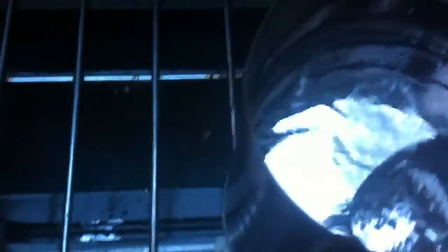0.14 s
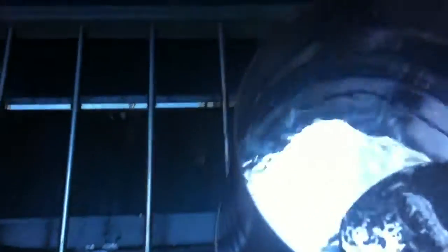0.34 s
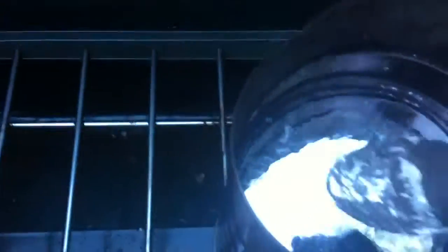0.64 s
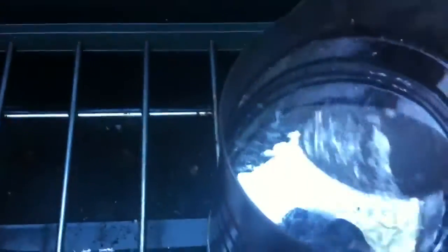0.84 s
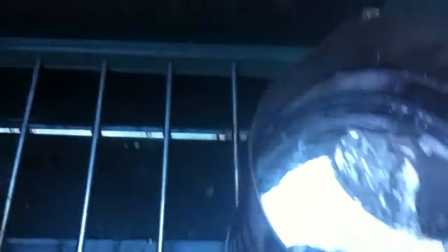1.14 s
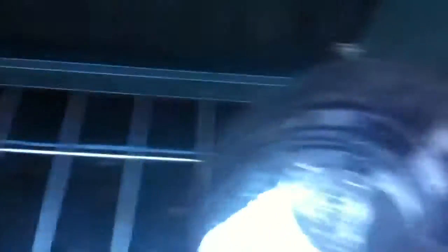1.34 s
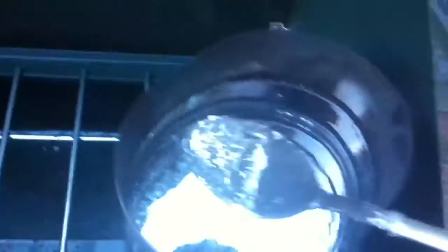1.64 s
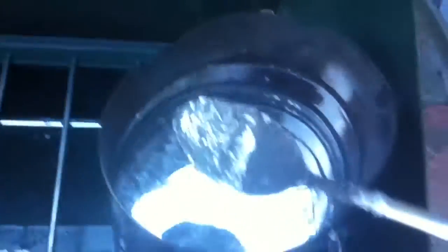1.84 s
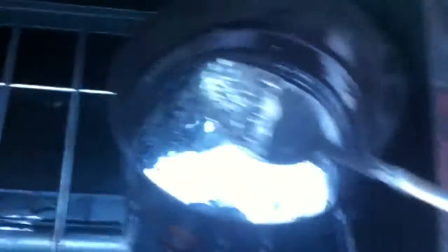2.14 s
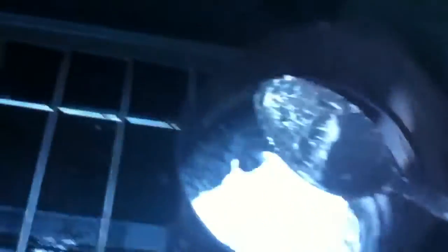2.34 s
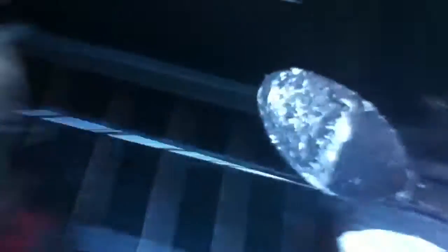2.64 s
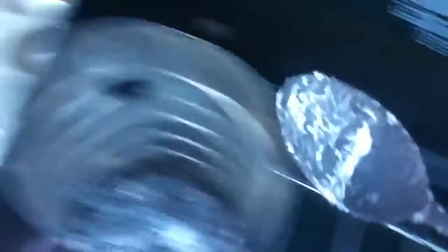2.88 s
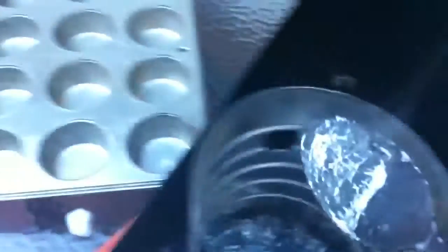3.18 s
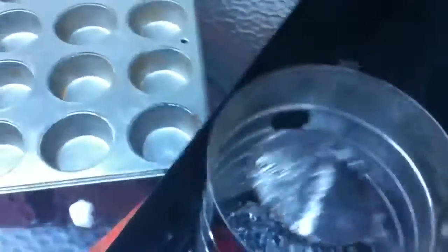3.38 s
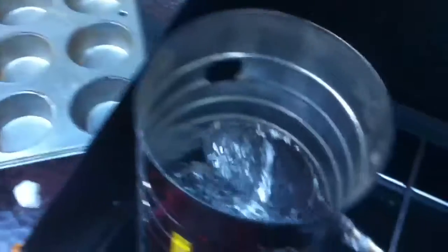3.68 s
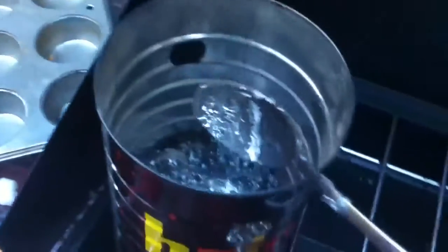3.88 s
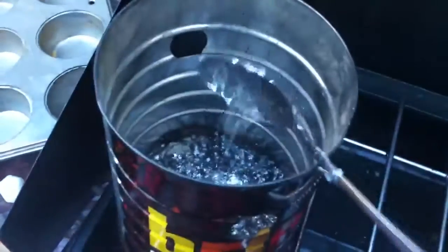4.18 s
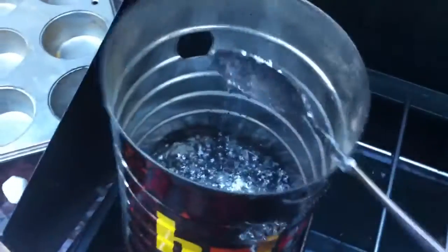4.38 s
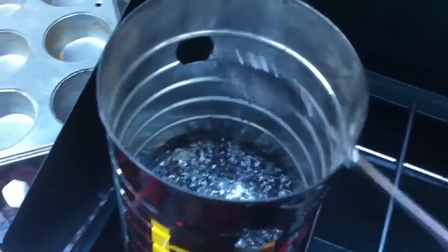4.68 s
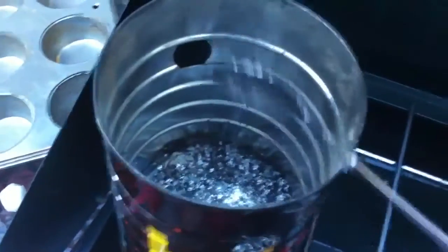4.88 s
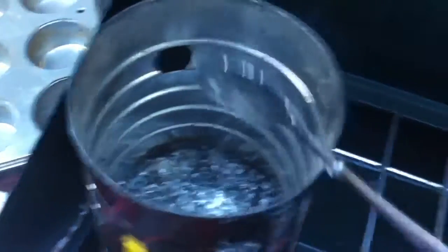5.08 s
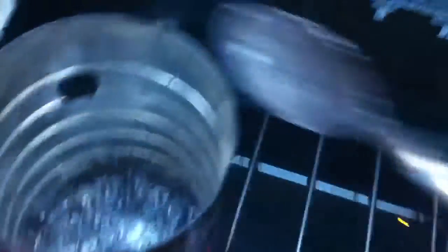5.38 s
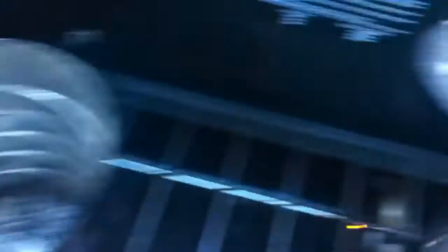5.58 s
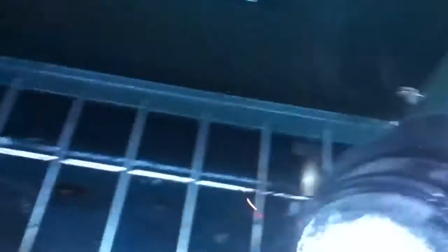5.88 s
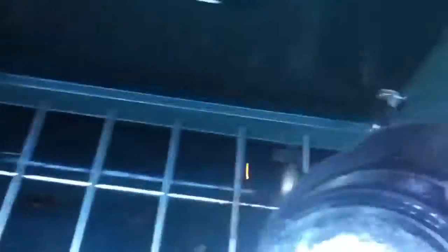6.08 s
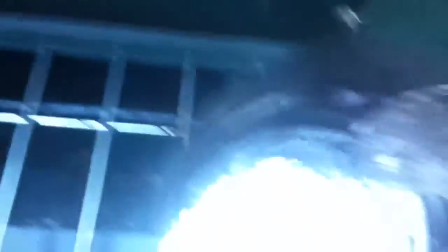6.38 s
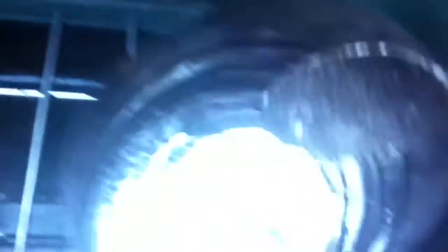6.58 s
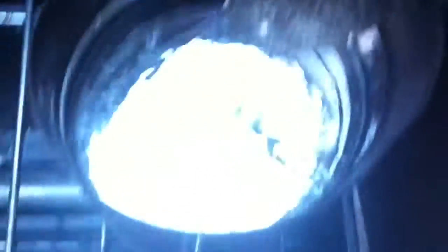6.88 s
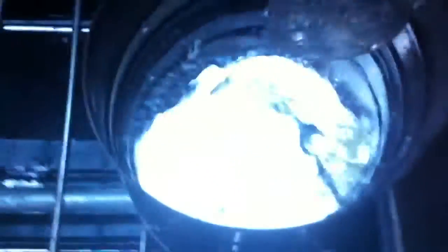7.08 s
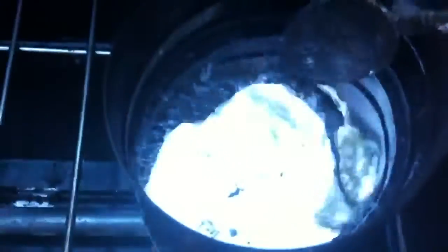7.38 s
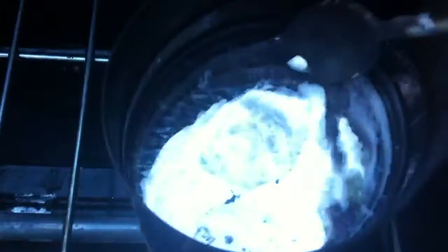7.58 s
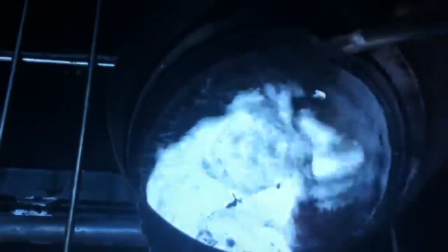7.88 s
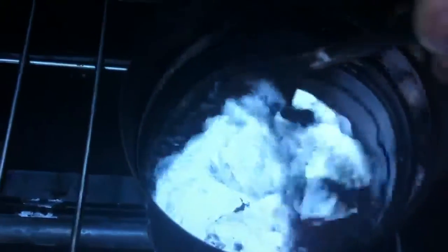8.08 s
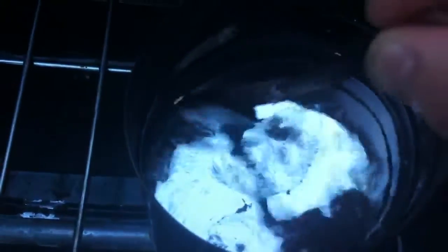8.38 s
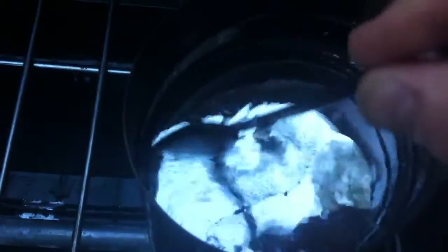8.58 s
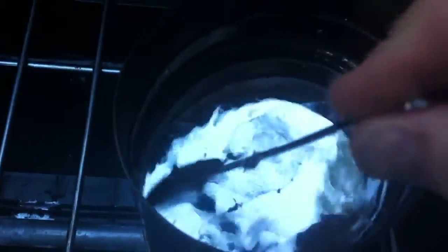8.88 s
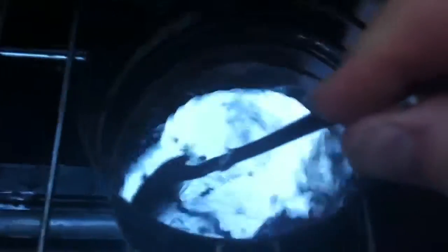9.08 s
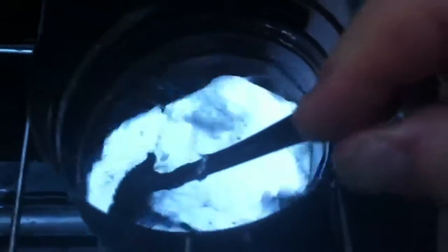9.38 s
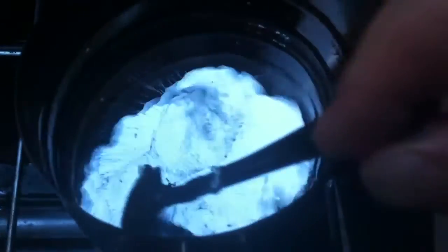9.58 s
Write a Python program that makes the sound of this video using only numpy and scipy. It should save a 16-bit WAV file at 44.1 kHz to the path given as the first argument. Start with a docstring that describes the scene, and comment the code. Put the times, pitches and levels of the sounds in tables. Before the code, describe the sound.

Several sharp, ringing spoon knocks on a tin can and a clatter on wood, over the steady hiss and low roar of a gas burner.

```python
"""A spoon is knocked clean on the rim of an empty can: the thin wall crashes, thumps and rings,
and the spoon bounces in ever shorter hops. It is then dropped and clatters on a wooden bench.
Crumbs of dross snap, and a thin rod stirs softly through the crust on a tin of molten metal.
Under it all a gas burner hisses, sings and roars, its tone shifting as the listener moves.
The knocks and the clatter echo briefly in the workshop."""
import sys
import numpy as np
from scipy import signal
from scipy.fft import rfft, irfft, next_fast_len
from scipy.io import wavfile
from scipy.ndimage import uniform_filter1d

SR = 44100
rng = np.random.default_rng(int(sys.argv[2]) if len(sys.argv) > 2 else 0)


def inscribe(sig):
    """Save sig as 16-bit PCM at rate SR to the path in sys.argv[1].

    A 1-D sig is mono; a 2-D sig holds one channel per row.
    Samples are clipped to [-1, 1] before scaling.
    """
    pcm = np.round(np.clip(np.atleast_2d(sig).T, -1, 1) * 32767)
    wavfile.write(sys.argv[1], SR, pcm.astype(np.int16))


N = 429534
RING_SIZE = 49152
AGE = np.arange(RING_SIZE) / SR   # seconds since a sound began

# Spoon blows on the can; a touch or flight of 0 means none:
# start_s, level_db, thump_db, treble_db, second_touch_s, first_flight_s, hand_damping_db
BLOWS = [(3.741, -13.5, -31.5, -55, 0, 0.0025, 0), (4.2018, -1, -20.5, 2, 0, 0, 0),
         (4.457, 2, -8, 3.5, 0.0092, 0.099, 10), (4.6919, 2.5, -11.5, 4, 0.0013, 0.057, 21),
         (4.904, 4.5, -9.5, -2, 0.018, 0.0642, 6), (5.1033, 6.5, -7.5, -0.5, 0.024, 0.08, 1.5)]
RESTITUTION, BOUNCE_COUNT = 0.68, 4   # each flight lasts this share of the one before
BOUNCE_GROWTH, REFERENCE_FLIGHT_S = 0.93, 0.086   # longer flights land harder
TOUCH_LOSS_DB_PER_S, GRIP_GROWTH = 380, 3.3   # late touches are weaker; the hand chokes late bounces
TOUCH_TREBLE_DB, BOUNCE_TREBLE_DB, LIGHT_THUMP_DB = -12, -8.5, -27   # light contacts: dull, little body


def spoon_contacts():
    """Blows with their second touches, and bounces: two lists of start_s, level_db, thump_db, treble_db."""
    blows, bounces = [], []
    for s, db, thump_db, treble_db, touch_s, flight_s, damping_db in BLOWS:
        blows.append((s, db, thump_db, treble_db))
        if touch_s > 0:
            touch_db = db - TOUCH_LOSS_DB_PER_S * touch_s
            blows.append((s + touch_s, touch_db, touch_db + LIGHT_THUMP_DB, TOUCH_TREBLE_DB))
        for k in range(BOUNCE_COUNT if flight_s > 0 else 0):
            free_db = BOUNCE_GROWTH * 20 * np.log10(flight_s / REFERENCE_FLIGHT_S)
            landing_db = free_db - damping_db * k ** GRIP_GROWTH
            s += flight_s
            bounces.append((s, landing_db, landing_db + LIGHT_THUMP_DB, BOUNCE_TREBLE_DB))
            flight_s *= RESTITUTION
    return blows, bounces


# Tone of the can's wash of weak modes: pitch_hz, density_db
CAN_COLOUR = [(80, -30), (160, -12.5), (450, 4.5), (700, -2.5), (1200, 2.5), (1900, 7.5), (3200, 4.5),
              (3600, 2.5), (4600, 1.5), (6200, -3), (10000, -4), (12300, -2.5), (14000, -4), (16000, -9)]
# Decay of that wash: pitch_hz, t60_s
CAN_T60 = [(100, 0.074), (2000, 0.18), (6000, 0.15), (15000, 0.077)]
# Decay of the contact's short crack: pitch_hz, t60_s
CRACK_T60 = [(200, 0.043), (15000, 0.064)]


def can_crashes(hits):
    """The spoon's edge cracks on the rim and sets the thin can crashing."""
    out = np.zeros(N)
    wash = from_db(11) * dense_ring(CAN_COLOUR, CAN_T60, size=8192)
    for s, db, _, treble_db in hits:
        crack = from_db(9) * dense_ring(CAN_COLOUR, CRACK_T60, size=8192)
        crash = brighten(wash + crack, treble_db, contact_corner(treble_db, base_hz=3200))
        add(out, s, from_db(db) * crash)
    return out


def can_thumps(hits):
    """The thin wall heaves for a few cycles; a deep dent stiffens it, so the pitch starts high and sags."""
    out = np.zeros(N)
    swell = AGE / 0.0056
    envelope = (swell * np.exp(1 - swell)) ** 2
    for s, _, thump_db, _ in hits:
        pitch_hz = 412 * (1 + 0.87 * from_db(thump_db) * np.exp(-AGE / 0.0066))
        heave = envelope * np.sin(2 * np.pi * np.cumsum(pitch_hz) / SR)
        add(out, s, from_db(thump_db) * heave)
    return out


# Partials that ring after a knock: low hum of room and bench, then the can's ring:
# pitch_hz, level_db, t60_s
KNOCK_MODES = [(155.4, -21, 0.8), (195.6, -10.5, 0.45), (219.4, -18, 0.48), (258, -32, 5.9),
               (296.5, -19.5, 0.59), (368.7, -8.5, 0.41), (521.4, -27, 3.1), (790, -15, 0.25),
               (930, -15.5, 0.24), (1044, -36, 0.19), (1187, -1.5, 0.04), (1427, -11, 0.28),
               (1770, -4, 0.18), (1867, -1, 0.13), (1980, -3, 0.16), (2655, -7, 0.32), (2740, 7, 0.04),
               (3180, 6, 0.051), (3200, 6, 0.045), (3350, -18, 0.066), (3764, -1, 0.071), (3940, -6, 0.12),
               (4270, 3.5, 0.064), (4590, -1.5, 0.17), (5230, -1, 0.053), (7030, -2, 0.075),
               (9750, 5, 0.059), (10150, -0.5, 0.041), (11000, -27, 0.06), (13600, -11, 0.041)]


def knock_ring(hits):
    """Every blow lands on a slightly different spot and stirs the same modes in a new mix."""
    return from_db(-23.5) * struck(KNOCK_MODES, hits, scatter_db=2.5)


# Partials of the can that the bounces bring out: pitch_hz, level_db, t60_s
BOUNCE_MODES = [(2726, -13.5, 0.063), (4900, -29.5, 0.064)]


def bounce_pings(bounces):
    """The can pings brightly as the bouncing spoon lands on another spot."""
    return struck(BOUNCE_MODES, bounces, scatter_db=1)


# The dropped spoon's landings: start_s, level_db, treble_db
LANDINGS = [(5.649, 2.5, -18), (5.656, -3.5, -17), (5.687, -21, 15), (5.713, -8, 1), (5.730, -11, 1.5),
            (5.798, -29.5, 13.5), (6.091, -31, -12)]
# Tone of the wooden bench top: pitch_hz, density_db
BENCH_COLOUR = [(30, -38), (95, -35), (150, -7), (215, -1.5), (320, 2), (600, 5), (950, 4.5), (1350, 9.5),
                (1900, 9), (2600, 2.5), (4200, -2), (5500, -9.5), (8500, -12), (15000, -24)]
# Decay of the wood: pitch_hz, t60_s
BENCH_T60 = [(100, 0.12), (1000, 0.1), (4000, 0.22), (15000, 0.17)]


def dropped_spoon():
    """A dull bang on the bench top, then a quick clatter as the spoon rocks to rest."""
    out = np.zeros(N)
    for s, db, treble_db in LANDINGS:
        bang = dense_ring(BENCH_COLOUR, BENCH_T60, size=12288)
        add(out, s, from_db(db + 15.5) * brighten(bang, treble_db, corner_hz=3530))
    return out


# The bench's strongest partials: pitch_hz, level_db, t60_s
BENCH_MODES = [(194, -1.5, 0.39), (245, -1, 0.25), (314, -15, 0.48), (460, 0, 0.47), (775, -7, 0.72),
               (840, -1.5, 0.36), (1015, -5, 0.37), (1070, -11, 0.24), (1297, 1, 0.32), (1400, 11, 0.16),
               (1660, 4, 0.13), (2510, 17, 0.053)]


def bench_ring():
    """The bench rings on after each landing."""
    return from_db(-27.5) * struck(BENCH_MODES, LANDINGS, scatter_db=0)


# Small dry ticks: start_s, level_db
TICKS = [(5.462, -7), (8.105, -27)]


def dross_ticks():
    """Crumbs of dross snap, each over in a millisecond or two."""
    out = np.zeros(N)
    for s, db in TICKS:
        snap = rng.standard_normal(512) * np.exp(-AGE[:512] / 0.00041)
        softened = signal.lfilter(*signal.butter(1, [600, 2200], "band", fs=SR), snap)
        add(out, s, from_db(db) * energy_one(softened))
    return out


# Strokes of the rod: middle_s, length_s, level_db
STROKES = [(8.1, 0.21, -51.5), (8.652, 0.8, -52.5), (9.115, 0.42, -50.5), (9.67, 0.43, -54.5)]
# Tone of the crumbling crust: pitch_hz, density_db
CRUST_COLOUR = [(60, -40), (160, -11), (270, 9), (400, 3.5), (620, -3), (900, 7.5), (1300, -8.5),
                (2500, -4), (4000, -8), (8000, -11), (16000, -20)]
# Lumps of dross turning over: start_s, level_db
LUMPS = [(7.656, -19), (8.091, -22), (8.275, -19.5), (8.433, -19), (8.655, -23), (8.761, -15)]
# Their dull decay: pitch_hz, t60_s
LUMP_T60 = [(200, 0.14), (8000, 0.18)]
GRAINS_PER_S = 4000


def stirring_rod():
    """The crust crumbles in clumps of tiny grains with each stroke; now and then a lump turns over."""
    grains = (rng.random(N) < GRAINS_PER_S / SR) * rng.standard_normal(N)
    grains *= from_db(1.9 * np.tanh(drift(per_s=22)))
    now = np.arange(N) / SR
    push = sum(from_db(db) * np.cos(np.pi * np.clip((now - middle_s) / length_s, -.5, .5))
               for middle_s, length_s, db in STROKES)
    out = push * colour(grains, CRUST_COLOUR)
    for s, db in LUMPS:
        lump = dense_ring(CRUST_COLOUR, LUMP_T60, size=8192)
        soft_attack = 1 - np.exp(-AGE[:len(lump)] / 0.0044)
        add(out, s, from_db(db) * lump * soft_attack)
    return out


# The listener's path: time_s, stove_nearness_db, turn_share (0 faces the stove, 1 the can)
LISTENER = [(0, 1.5, 0.23), (1.2, -0.2, 0.27), (1.7, 1, 0.17), (2.3, -1.2, 0.15), (2.7, 2.7, 0.38),
            (2.95, -1, 0.53), (3.25, 2, 1), (4.2, 1, 0.86), (5.4, 3.5, 0.47), (5.9, 3, 0.05), (7.3, -4, 0),
            (8.5, 1, 0), (9.7, -1.8, 0)]
# Level ride of the flame's low roar: time_s, level_db
FLAME_LEVEL = [(0.9, -56.5), (1.6, -59.5), (2.8, -58.5), (3.6, -58), (6.2, -54.5), (7.2, -58), (9.7, -56)]
# Tone of the roar: pitch_hz, density_db
FLAME_COLOUR = [(25, -21), (55, -19), (80, -20), (110, -4.5), (160, -1.5), (230, 0), (320, -4.5), (480, -9),
                (1000, -8.5), (1300, -20), (3000, -29.5)]
# Resonances of burner tube and tin: pitch_hz, nominal_width_hz, facing_db, turned_db
TUBE_MODES = [(689, 40, -1.5, -10.5), (1429, 217, -11.5, -9), (1717.5, 115, 1.5, 1.5),
              (1991, 57, -1.5, 6.5), (2129, 195, -1, -8), (2566, 97, -4.5, -11.5), (2950, 46, -1, -41),
              (3746, 81, -7.5, -16.5), (4494, 39, -7, -12)]
# Resonances of the gas jet: pitch_hz, nominal_width_hz, facing_db, turned_db
JET_MODES = [(5132, 55, 1.5, 5), (5775, 130, -6.5, 2.5), (6247, 88, 0.5, -2.5), (6790, 120, -2, 0),
             (7400, 205, 1.5, -3.5), (8005, 165, 4, 1), (8670, 77, -7, -3.5), (9400, 69, 1, -27.5),
             (10000, 170, -7.5, -6.5), (10590, 900, -2.5, -12.5), (13230, 430, 1.5, 0), (13730, 130, 3, 3),
             (14450, 400, -7, -11), (15450, 420, 2, -2)]
# Tone of the jet's broad hiss: pitch_hz, density_db
JET_COLOUR = [(300, -39), (1000, -14), (2600, 6), (4200, 1.5), (7500, 0), (9000, 0.5), (10500, -6),
              (11900, -9), (13500, 2), (16000, 3.5)]
TUBE_DB, JET_DB = -47.5, -49.5   # at nearness 0
JET_NEARNESS_SHARE, HISS_TURNED_DB = 0.54, -6.5   # the broad hiss beams away from the can


def gas_burner():
    """The jet hisses; the mixing tube sings and the flame roars low, both fluttering with the flow."""
    near_db, turned = in_time(LISTENER)
    flame_db = in_time(FLAME_LEVEL)[0] + 1.2 * drift(per_s=47)
    flame = from_db(flame_db) * colour(rng.standard_normal(N), FLAME_COLOUR)
    tube_db = TUBE_DB + near_db + 0.96 * drift(per_s=45)
    tube = from_db(tube_db) * blown(TUBE_MODES, turned)
    whistle = blown(JET_MODES, turned)
    hiss = from_db(HISS_TURNED_DB * turned) * colour(rng.standard_normal(N), JET_COLOUR)
    jet = from_db(JET_DB + JET_NEARNESS_SHARE * near_db) * sway(whistle + hiss, wander_s=.00004)
    return flame + tube + jet


def blown(modes, turned):
    """Turbulence sings in resonances; each beams in its own way, so turning changes their mix."""
    out = 0
    for hz, width_hz, facing_db, turned_db in modes:
        peak = resonate(rng.standard_normal(N), hz, 0.64 * width_hz)
        song = resonate(peak, hz, 4.2 * width_hz)   # trims the skirts
        out = out + song * ((1 - turned) * from_db(facing_db) + turned * from_db(turned_db))
    return rms_one(out)


# Close reflections off tin and stove lid: delay_s, level_db
NEAR_ECHOES = [(.0007, -2.5), (.0013, -1), (.0023, -17.5), (.0036, -1.5)]


def sway(x, wander_s):
    """The listener moves among nearby metal walls, whose echoes comb the hiss in shifting patterns."""
    now, out = np.arange(N), x
    for delay_s, db in NEAR_ECHOES:
        lag = (delay_s + wander_s * np.tanh(drift(per_s=2.5))) * SR
        out = out + from_db(db) * np.interp(now - lag, now, x)
    return rms_one(out)


# Tone of the workshop's reverb: pitch_hz, density_db
ROOM_COLOUR = [(40, -20), (100, -2.5), (170, 15.5), (330, 12), (480, 1.5), (1000, 9.5), (2000, -0.5),
               (4000, -12), (8000, -3), (16000, -23)]
# Length of its tail: pitch_hz, t60_s
ROOM_T60 = [(120, 1), (320, 0.68), (840, 0.48), (2200, 0.38), (5800, 0.37), (15000, 0.5)]


def workshop(x):
    """Reflections build up over the first milliseconds; the bass lingers longest."""
    build_up = 1 - np.exp(-(AGE / 0.014) ** 2)
    tail = dense_ring(ROOM_COLOUR, ROOM_T60, size=RING_SIZE) * build_up
    return signal.fftconvolve(x, tail)[:N]


def struck(modes, hits, scatter_db):
    """Each hit kicks a set of decaying sines; soft contacts miss the high ones."""
    s, hit_db, *_, treble_db = np.transpose(hits)
    corner_hz = contact_corner(treble_db, base_hz=4200)
    out = np.zeros(N)
    for hz, level_db, t60_s in modes:
        hardness_db = treble_db * hz ** 2 / (hz ** 2 + corner_hz ** 2)
        strengths = from_db(hit_db + hardness_db + level_db + scatter_db * rng.standard_normal(len(s)))
        kicks = np.full(N, 1e-18)
        kicks[np.round(s * SR).astype(int)] = strengths * rng.choice([-1, 1], len(s))
        r, w = np.exp(-np.log(1000) / (t60_s * SR)), 2 * np.pi * hz / SR
        out += signal.lfilter([0, np.sin(w)], [1, -2 * r * np.cos(w), r * r], kicks)
    return out


def dense_ring(spectrum, decays, size):
    """Countless overlapping modes: noise in which each octave dies at its own rate."""
    hz = np.fft.rfftfreq(size, 1 / SR)
    modes = np.exp(2j * np.pi * rng.random(len(hz))) * from_db(at_hz(spectrum, hz))
    out = 0
    for low_hz in 20 * 2. ** np.arange(10):
        octave = irfft(modes * (hz >= low_hz) * (hz < 2 * low_hz))
        t60_s = at_hz(decays, low_hz * np.sqrt(2))
        out = out + octave * np.exp(-np.log(1000) * AGE[:size] / t60_s)
    return energy_one(out)


def contact_corner(treble_db, base_hz):
    """A soft contact lasts longer, so its treble rolls off from a lower pitch."""
    return base_hz * from_db(0.11 * treble_db)


def brighten(x, treble_db, corner_hz):
    """A harder contact lifts the treble, a softer one dulls it: two gentle shelves in a row."""
    for _ in range(2):
        low = signal.lfilter(*signal.butter(1, corner_hz, fs=SR), x)
        x = low + from_db(treble_db / 2) * (x - low)
    return x


def resonate(x, hz, width_hz):
    """Two-pole resonance with a peak gain of 1."""
    r = np.exp(-np.pi * width_hz / SR)
    feedback = [1, -2 * r * np.cos(2 * np.pi * hz / SR), r * r]
    return signal.lfilter(np.array([1, 0, -1]) * (1 - r * r) / 2, feedback, x)


def colour(x, spectrum):
    """Give a steady sound a spectrum; rms 1."""
    size = next_fast_len(len(x), True)
    gains = from_db(at_hz(spectrum, np.fft.rfftfreq(size, 1 / SR)))
    return rms_one(irfft(rfft(x, size) * gains, size)[:len(x)])


def drift(per_s):
    """Random wander of spread 1."""
    knots = rng.standard_normal(4000)
    return rms_one(np.interp(np.arange(N) / SR * per_s, np.arange(len(knots)), knots))


def in_time(rows):
    """One curve per column, at every sample."""
    s, *columns = np.transpose(rows)
    return [np.interp(np.arange(N) / SR, s, column) for column in columns]


def at_hz(points, hz):
    """Read a table on a log-frequency axis."""
    known_hz, values = np.transpose(points)
    return np.interp(np.log(hz + 1e-3), np.log(known_hz), values)


def add(out, s, sound):
    """Mix a sound in at time s."""
    start = int(round(s * SR))
    out[start:start + len(sound)] += sound[:N - start]


def from_db(db):
    """Decibels to gain."""
    return 10 ** (np.asarray(db) / 20)


def rms_one(x):
    """Scale to rms 1."""
    return x / np.sqrt(np.mean(x ** 2) + 1e-20)


def energy_one(x):
    """Scale to a total energy of 1."""
    return x / np.sqrt(np.sum(x ** 2) + 1e-20)


def gain_control(x, threshold_db, share, attack_s, release_db_per_s):
    """Turn the level down by a share of its excess over the threshold, then let it creep back."""
    level_db = 10 * np.log10(np.abs(uniform_filter1d(x ** 2, size=441)) + 1e-12)
    excess_db = np.maximum(level_db - threshold_db, 0)
    recovery_db = release_db_per_s * np.arange(N) / SR
    cut_db = np.maximum.accumulate(share * excess_db + recovery_db, axis=-1) - recovery_db
    r = np.exp(-1 / (attack_s * SR))
    return x * from_db(-signal.lfilter([1 - r], [1, -r], cut_db))


def scene():
    """The impacts feed the reverb; the rings, the stirring and the burner are mixed in directly."""
    blows, bounces = spoon_contacts()
    hits = blows + bounces
    impacts = can_crashes(hits) + dropped_spoon() + dross_ticks()
    thumps = can_thumps(hits)
    rings = knock_ring(hits) + bench_ring() + bounce_pings(bounces)
    room = from_db(-5.5) * workshop(impacts + from_db(-11) * thumps)
    return (impacts + thumps + rings + gas_burner() + stirring_rod() + room)[None]


def record(dry):
    """Thin out the deep bass, ride the gain, round the loudest peaks and cut the top."""
    thin = signal.sosfilt(signal.butter(2, 72, "high", fs=SR, output="sos"), dry)
    ridden = gain_control(thin, threshold_db=-32.5, share=0.21, attack_s=0.062, release_db_per_s=4.5)
    rounded = 0.82 * np.tanh(ridden / 0.87)
    return signal.sosfilt(signal.ellip(12, .1, 80, 15850, fs=SR, output="sos"), rounded)


dry = scene()
out = record(dry)
inscribe(out)
```